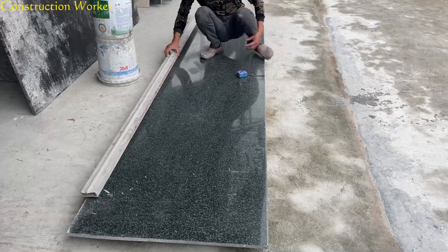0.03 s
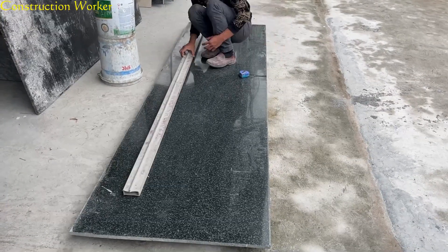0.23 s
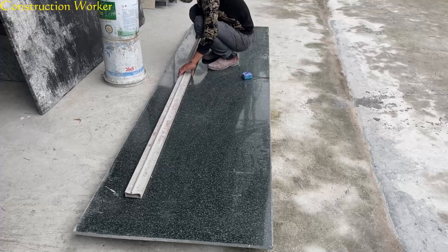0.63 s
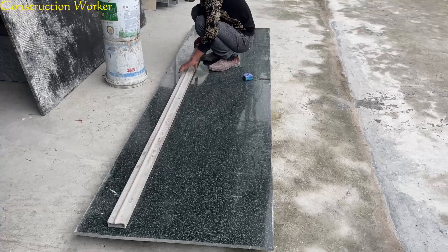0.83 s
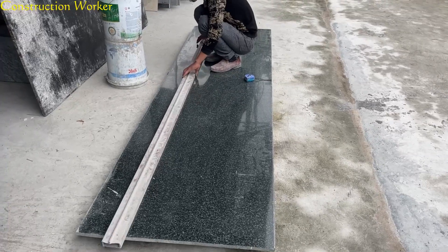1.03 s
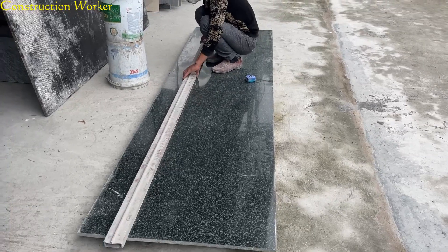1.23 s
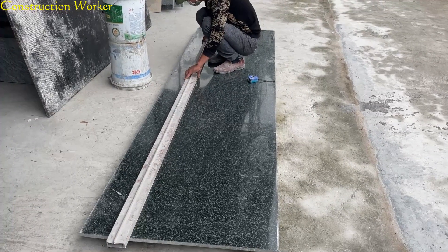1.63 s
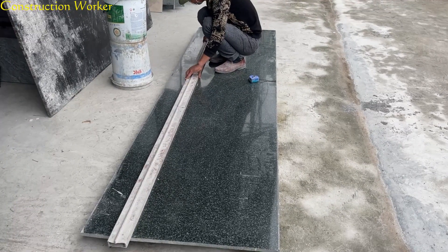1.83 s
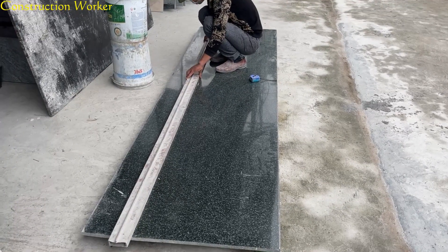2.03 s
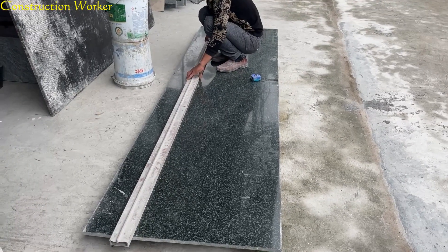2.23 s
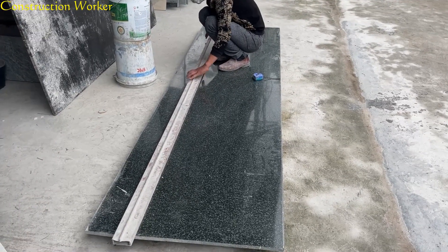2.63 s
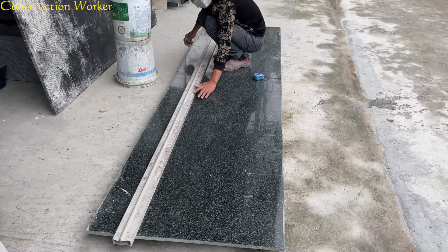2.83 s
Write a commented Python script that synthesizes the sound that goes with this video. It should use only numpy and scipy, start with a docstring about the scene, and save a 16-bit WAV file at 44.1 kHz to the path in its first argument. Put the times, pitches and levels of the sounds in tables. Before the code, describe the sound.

A long hollow metal bar clacks down on a stone slab close by, scrapes over grit with one bright snap, then settles with soft scuffs and faint clinks. Outdoors, a distant engine throbs and wind bumps the microphone.

```python
"""Metal straightedge on granite

Close by, a long hollow metal straightedge clacks down on a granite slab and slides over the grit.
Its edge catches once with a bright snap, then it is eased into place with soft scuffs and two
faint clinks. We are outdoors: an engine throbs in the distance, wind bumps the microphone,
and nearby walls give the bar a short tail."""
import sys
import numpy as np
from scipy import signal
from scipy.fft import rfft, irfft
from scipy.io import wavfile

SR = 44100
rng = np.random.default_rng(int(sys.argv[2]) if len(sys.argv) > 2 else 0)


def pcm_store(signal):
    """Save signal as 16-bit PCM."""
    levels = np.round(np.clip(np.atleast_2d(signal), -1, 1) * 32767)
    wavfile.write(sys.argv[1], SR, levels.astype(np.int16).T)


N = 127890

# distant engine: time_s, level_db
ENGINE_LEVEL = [(0, -50), (.4, -40), (.55, -41), (.67, -54.5), (1.15, -40), (1.3, -46), (1.52, -34.5),
                (2.1, -39), (2.9, -47)]
# its exhaust: freq_hz, gain_db
EXHAUST_COLOUR = [(10, -59), (33, -12), (65, 0), (98, 0), (130, -4.5), (205, -11.5), (270, -31),
                  (3000, -68.5)]
# low breeze and higher flutter on the microphone: time_s, level_db
BREEZE_LEVEL = [(0, -39.5), (.45, -36), (.65, -48), (1.85, -35.5), (2.3, -29), (2.64, -36)]
FLUTTER_LEVEL = [(2.1, -55), (2.36, -52), (2.48, -45), (2.9, -44)]
# their spectra: freq_hz, gain_db
LOW_WIND_COLOUR = [(15, -3.5), (50, -4.5), (110, 2), (200, -16), (1000, -60.5)]
HIGH_WIND_COLOUR = [(100, -13), (260, 0), (800, -9), (4000, -45)]
# wind bumps: start_s, length_s, level_db, cutoff_hz
EDDIES = [(0.186, 0.096, -28, 197), (0.252, 0.0387, -13.5, 116), (0.254, 0.029, -27, 440),
          (2.167, 0.03, -17.5, 360), (2.173, 0.053, -16, 110), (2.227, 0.054, -27.5, 282),
          (2.368, 0.14, -38, 460), (2.511, 0.024, -20.5, 320), (2.607, 0.039, -28.5, 261)]
# open air: freq_hz, gain_db
AIR_COLOUR = [(30, 2), (200, 26.5), (400, 11.5), (2000, 3.5), (4500, -2.5), (7000, -6.5), (10300, -2.5),
              (11500, -19), (14000, -30), (16000, -107)]
# bar meets stone: start_s, decay_s, body_db, clack_db, edge_db
LANDINGS = [(0.013, 0.0086, -36, -41, -40), (.177, 0.02, -42.5, -43, -34), (.208, 0.041, -39.5, -39, -52),
            (0.313, 0.011, -49, -50, -48.5), (.351, 0.014, -18.5, -31.5, -35), (.394, 0.048, -35, -41, -55),
            (.621, 0.0069, -31.5, -32, -62), (.717, 0.0084, -41.5, -48, -39.5),
            (0.790, 0.012, -62, -42.5, -40), (0.92, 0.0064, -34.5, -26, -21), (.944, .016, -35, -37.5, -44),
            (0.999, 0.0031, -54, -36.5, -27), (1.113, 0.0048, -41, -39.5, -46)]
# modes of the bar: pitch_hz, gain_db, t60_s
BODY_MODES = [(436, -7, 0.35), (510.5, -10, 0.38), (674, -6.5, 0.19), (781, -7, 0.17), (907, 0.5, 0.11),
              (1026, -0.5, 0.1)]
# low, middle and high parts of a knock: freq_hz, gain_db
BODY_COLOUR = [(150, -23), (300, -7), (420, 0), (580, -2.5), (950, -4), (1400, -12.5), (5000, -39.5)]
CLACK_COLOUR = [(900, -13), (1450, 5.5), (2000, -2.5), (4400, 0.5), (6500, -9.5), (13000, -26)]
EDGE_COLOUR = [(3500, -10), (7000, -2.5), (8800, -0.5), (10200, 4), (11500, -7.5), (16000, -9)]
# resonances of the bar's thin walls: pitch_hz, width_hz, boost_db
BAR_WALL_PEAKS = [(2250, 70, 6), (3800, 260, 4), (4860, 160, 5), (8680, 90, 5), (8950, 110, 6)]
# sliding effort: time_s, level_db
SLIDE_LEVEL = [(0, -46.5), (.15, -73), (.6, -65), (.74, -50.5), (.787, -53.5), (.8, -36.5), (.91, -40),
               (.96, -35), (1.13, -46), (1.21, -61), (1.54, -48), (1.68, -52.5), (1.8, -61.5), (2.9, -59)]
# short pushes into place: start_s, length_s, level_db
PUSHES = [(1.586, 0.091, -47), (1.875, 0.053, -42), (2.468, 0.037, -51), (2.804, 0.038, -49.5)]
# grit under the slide and under a push: freq_hz, gain_db
SCRAPE_COLOUR = [(150, 12), (450, 4.5), (850, 10), (1250, 0), (2200, -0.5), (4200, 3.5), (7000, 2.5),
                 (10000, 1.5), (11600, -6), (15000, -7.5)]
SCUFF_COLOUR = [(300, 0.5), (2600, 2.5), (10000, -5.5), (15000, -17)]
# the dragged edge sings: start_s, length_s, pitch_hz, rise_hz, level_db
EDGE_SQUEAKS = [(.183, .07, 845, 0, -32), (.18, .05, 2700, 0, -45), (.256, .04, 560, 260, -35),
                (.832, .065, 870, 90, -41), (1.092, .055, 720, 200, -42), (2.655, .022, 6150, 0, -54),
                (2.654, .05, 6850, 0, -56)]
# faint clinks: start_s, level_db
TOUCHES = [(2.606, -46), (2.641, -49)]
# their modes: pitch_hz, gain_db, t60_s
TOUCH_MODES = [(1270, 1, .3), (1846, 0, .2), (2780, -7, .12)]

FIRING_HZ, FIRING_JITTER, FIRING_SCATTER_DB, RUMBLE_DB = 32.34, .015, 1.8, -8
AIR_DB, ATTACK_S, TOP_HZ = -47.5, 0.0081, 15900
CLACK_TOP_HZ, HARDNESS_DB_PER_OCTAVE = 6900, 15.5
RIPPLE_DB, RIPPLE_SPACING_HZ = 2.0, 110
GRIT_PER_S, GRIT_SPREAD_DB = 7000, 3
JUDDER_DB, JUDDER_HZ, PATCHY_DB, PATCHY_HZ = 2.2, 70, 2.5, 24
YARD_T60_S, YARD_TREBLE_T60_S, YARD_DB, YARD_DELAY_S = 0.31, 0.2, -3.5, 0.0073
LIKENESS, BASS_LIKENESS = 0.026, 0.37  # correlation of left and right
BAR_PAN_DB = 2  # left over right


def undb(db):
    """Decibels to gain."""
    return 10 ** (np.asarray(db) / 20)


def unit(x):
    """Scale to rms 1."""
    return x / np.sqrt(np.mean(x ** 2))


def curve(rows):
    """Gain over time from rows of time_s, level_db."""
    return undb(np.interp(np.arange(N) / SR, *np.array(rows).T))


def since(start):
    """Seconds since an event, zero before it."""
    return np.maximum(np.arange(N) / SR - start, 0)


def ramp(start, length):
    """Rise from 0 to 1, then hold."""
    return np.minimum(since(start) / length, 1)


def swell(start, length):
    """One smooth rise and fall."""
    return np.sin(np.pi * ramp(start, length))


def walk(rate_hz):
    """Random wander with a spread near 1."""
    return np.interp(np.arange(N) / SR * rate_hz, np.arange(1000), rng.standard_normal(1000))


def noise(likeness=LIKENESS):
    """Two partly alike channels of white noise."""
    mid, side = rng.standard_normal((2, N))
    return np.sqrt((1 + likeness) / 2) * mid + np.sqrt((1 - likeness) / 2) * np.array([side, -side])


def filtered(x, order, hz, kind="low"):
    """Low-pass or band-pass with a flat passband."""
    return signal.sosfilt(signal.butter(order, hz, kind, fs=SR, output="sos"), x)


def colour(x, points, peaks=(), size=16384):
    """Causal filter of unit energy from rows of freq_hz, gain_db and resonant peaks."""
    freqs = np.maximum(np.arange(size // 2 + 1) * SR / size, 1)
    hz, db = np.array(points).T
    db = np.interp(np.log(freqs), np.log(hz), db)
    db += sum(boost / (1 + (2 * (freqs - centre) / width) ** 2) for centre, width, boost in peaks)
    cepstrum = irfft(np.log(undb(db)))
    cepstrum[1:size // 2] *= 2  # fold to minimum phase
    cepstrum[size // 2 + 1:] = 0
    impulse = irfft(np.exp(rfft(cepstrum)))
    impulse /= np.linalg.norm(impulse)
    return signal.fftconvolve(np.atleast_2d(x), impulse[None], axes=1)[:, :N]


def engine():
    """Far off, slow firings thud through a dull exhaust, with a diffuse rumble around them."""
    count = np.floor(np.cumsum(FIRING_HZ * (1 + FIRING_JITTER * walk(12))) / SR)
    firings = unit(np.diff(count, prepend=0) * undb(FIRING_SCATTER_DB * walk(29.94)))
    return colour(firings + undb(RUMBLE_DB) * noise(0), EXHAUST_COLOUR) * curve(ENGINE_LEVEL)


def wind():
    """Single eddies bump the microphone over a low, fluttering breeze."""
    breeze = colour(noise(), LOW_WIND_COLOUR) * curve(BREEZE_LEVEL)
    flutter = colour(noise(), HIGH_WIND_COLOUR) * curve(FLUTTER_LEVEL) * undb(4.5 * walk(60))
    bumps = 0
    for start, length, db, hz in EDDIES:
        shape = swell(start, length)
        eddy = shape * filtered(noise(BASS_LIKENESS), 4, [hz / 5, hz], "band")
        bumps += undb(db) * unit(eddy) * np.sqrt(np.mean(shape ** 2))
    return breeze + flutter + bumps


def air():
    """The steady low hush of outdoors, all around the microphone."""
    return undb(AIR_DB) * colour(noise(), AIR_COLOUR)


def ring(start):
    """The struck bar's modes die away, reaching each channel in a phase of their own."""
    t = since(start)
    count = len(BODY_MODES)
    phases = rng.uniform(0, 2 * np.pi, (count, 1, 1)) + rng.normal(0, 1, (count, 2, 1))
    modes = sum(undb(db - 60 * t / t60) * np.sin(2 * np.pi * hz * t + phase)
                for (hz, db, t60), phase in zip(BODY_MODES, phases))
    return ramp(start, ATTACK_S) * modes


def hollow(x, points):
    """The bar's voice: its thin walls ring amid a ripple of many small resonances."""
    boosts_db = rng.normal(0, RIPPLE_DB, 140)
    ripples = [(k * RIPPLE_SPACING_HZ, RIPPLE_SPACING_HZ, boosts_db[k]) for k in range(12, 140)]
    return colour(x, points, BAR_WALL_PEAKS + ripples)


def knocks():
    """Each landing rattles along the bar and rings it; returns the ringing and the rattle."""
    body = clack = edge = ringing = 0
    for start, decay, body_db, clack_db, edge_db in LANDINGS:
        contact = ramp(start, ATTACK_S) * np.exp(-since(start + ATTACK_S) / decay)
        body += undb(body_db) * contact
        edge += undb(edge_db) * contact
        # a softer contact has less edge and a duller clack
        top_hz = min(CLACK_TOP_HZ * 2 ** ((edge_db - clack_db) / HARDNESS_DB_PER_OCTAVE), TOP_HZ)
        clack += undb(clack_db) * contact * filtered(noise(), 2, top_hz)
        ringing += 0.8394 * undb(body_db) * ring(start)
    rattle = hollow(body * noise(), BODY_COLOUR) + hollow(clack, CLACK_COLOUR)
    return ringing, rattle + hollow(edge * noise(), EDGE_COLOUR)


def patchy(x):
    """Half-octave bands swell and fade on their own as the points of contact shift."""
    position = 2 * np.log2(np.clip(np.arange(N // 2 + 1) * SR / N / 250, 1, 64))
    spectrum = rfft(x)
    bands = (irfft(spectrum * np.maximum(1 - abs(position - k), 0), N) for k in range(13))
    return sum(band * undb(PATCHY_DB * walk(PATCHY_HZ)) for band in bands)


def slide():
    """Grit ticks densely under the juddering bar, louder with effort; short pushes scuff."""
    ticks = rng.random(N) < GRIT_PER_S / SR
    grit = ticks * undb(GRIT_SPREAD_DB * np.minimum(rng.exponential(size=N), 5))
    friction = unit(patchy(grit * noise())) * undb(JUDDER_DB * walk(JUDDER_HZ))
    scrape = hollow(friction * curve(SLIDE_LEVEL), SCRAPE_COLOUR)
    pushes = sum(undb(db) * swell(start, length) for start, length, db in PUSHES)
    return scrape + hollow(unit(grit * noise()) * pushes, SCUFF_COLOUR)


def rasp(hz, width_hz):
    """A resonance driven by rough contact: its strength and phase keep changing."""
    phase = 2 * np.pi * np.cumsum(hz * np.ones(N)) / SR
    return np.array([walk(width_hz) * np.sin(phase) + walk(width_hz) * np.cos(phase) for _ in range(2)])


def squeaks():
    """The edge sticks and slips on the stone and sings hoarsely, at times rising in pitch."""
    return sum(undb(db) * swell(start, length) * rasp(hz + rise_hz * ramp(start, length), width_hz=150)
               for start, length, hz, rise_hz, db in EDGE_SQUEAKS)


def clinks():
    """Two light, chattering touches of metal as the bar settles."""
    out = 0
    for start, db in TOUCHES:
        for hz, mode_db, t60 in TOUCH_MODES:
            envelope = ramp(start, ATTACK_S) * undb(db + mode_db - 60 * since(start) / t60)
            out += envelope * rasp(hz, width_hz=110)
    return out


def yard(x):
    """Ground and nearby walls add a short diffuse tail, in which the treble dies first."""
    t = since(YARD_DELAY_S)
    white = noise(0)
    low = filtered(white, 1, hz=2500)
    tail = low * undb(-60 * t / YARD_T60_S) + (white - low) * undb(-60 * t / YARD_TREBLE_T60_S)
    impulse = unit((t > 0) * tail) / np.sqrt(N)
    return x + undb(YARD_DB) * signal.fftconvolve(x, impulse, axes=1)[:, :N]


def scene():
    """The bar close up and a little left of centre, with engine, wind and air around it."""
    ringing, rattle = knocks()
    bar = ringing + yard(rattle + slide() + squeaks() + clinks())
    pan = undb(np.array([[BAR_PAN_DB], [-BAR_PAN_DB]]) / 2)
    return bar * pan + engine() + wind() + air()


def record(dry):
    """The recorder cuts the top treble steeply."""
    return signal.sosfilt(signal.ellip(10, .2, 80, TOP_HZ, fs=SR, output="sos"), dry)


dry = scene()
out = record(dry)
pcm_store(out)
```